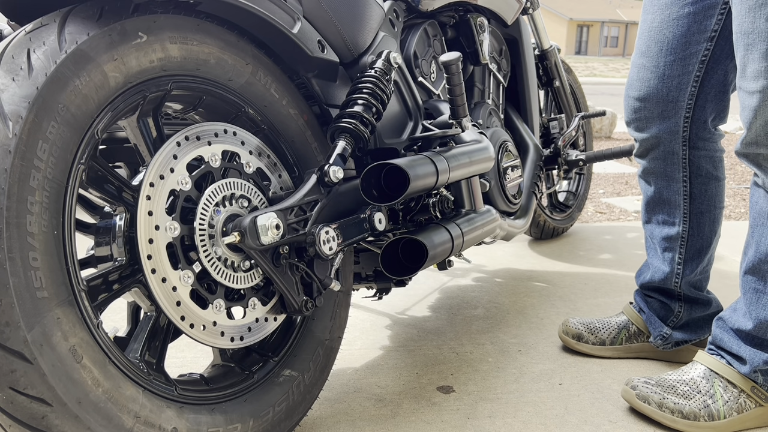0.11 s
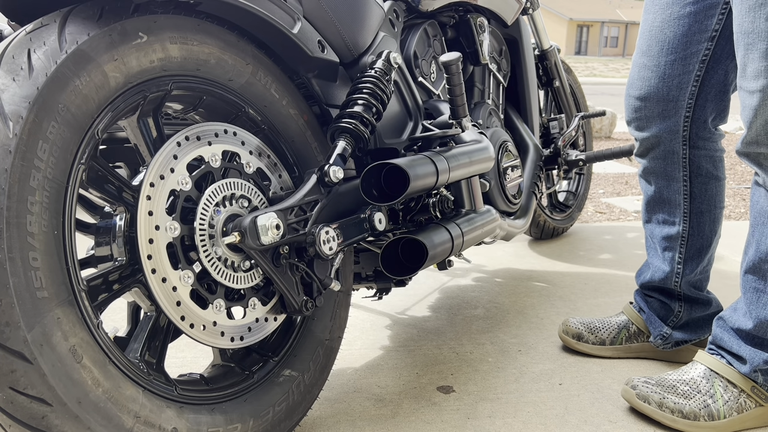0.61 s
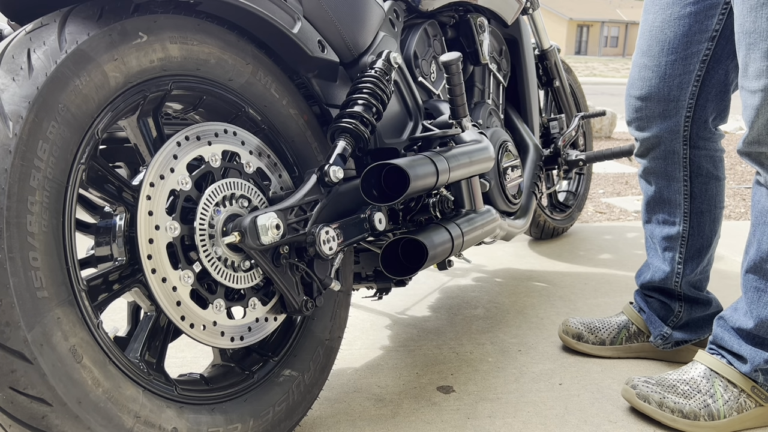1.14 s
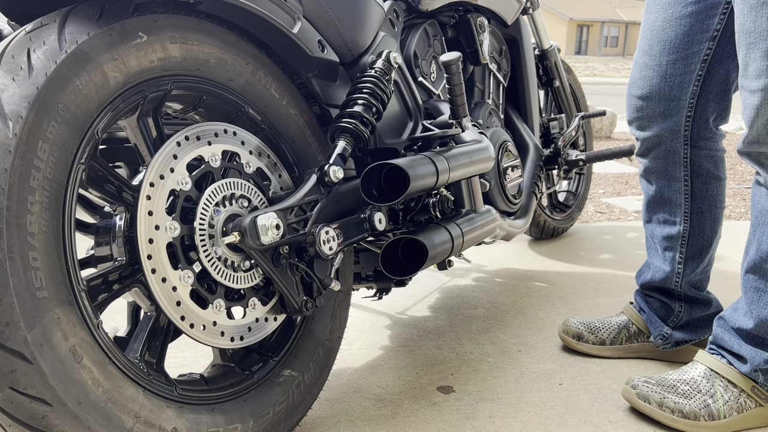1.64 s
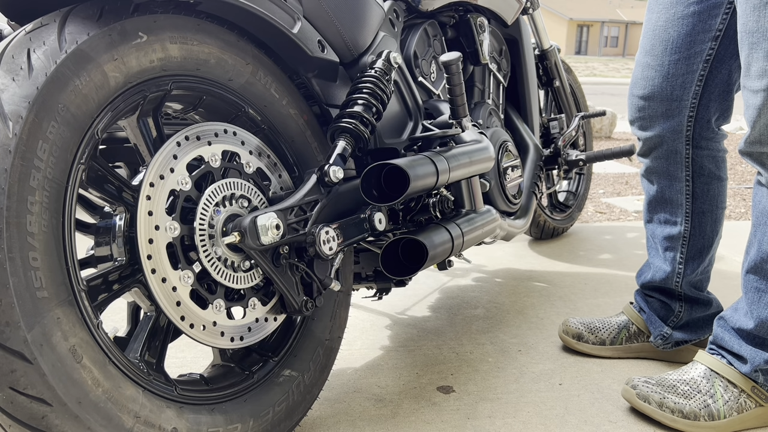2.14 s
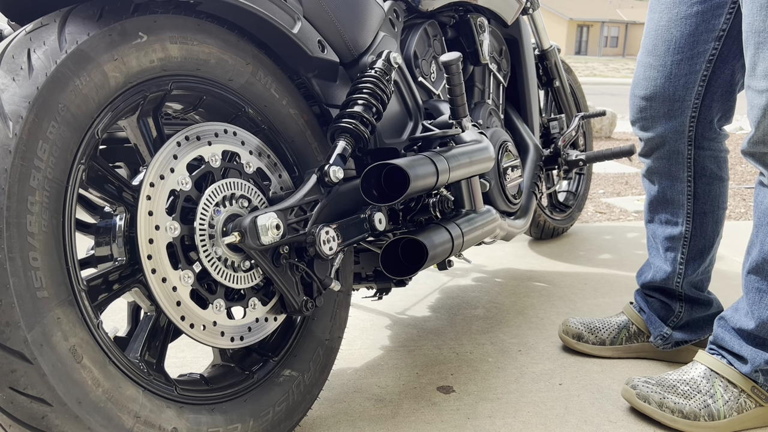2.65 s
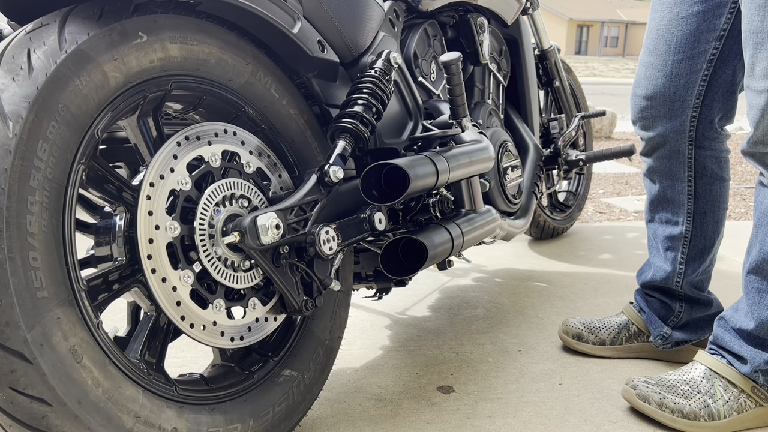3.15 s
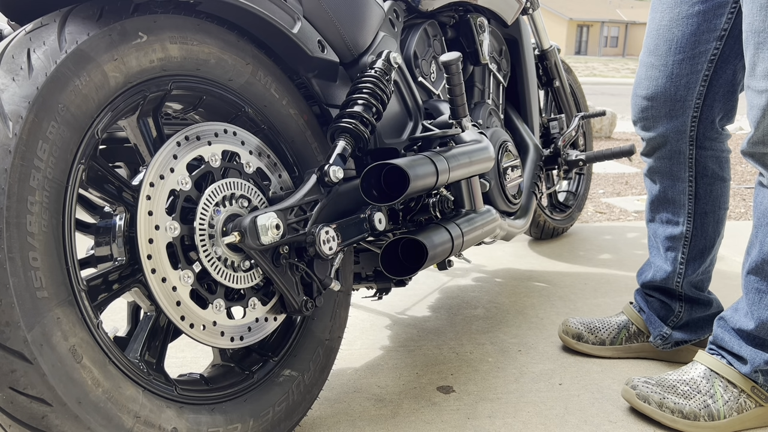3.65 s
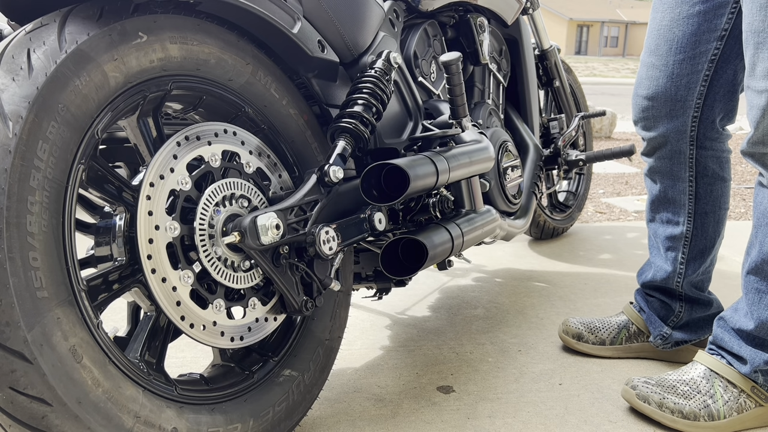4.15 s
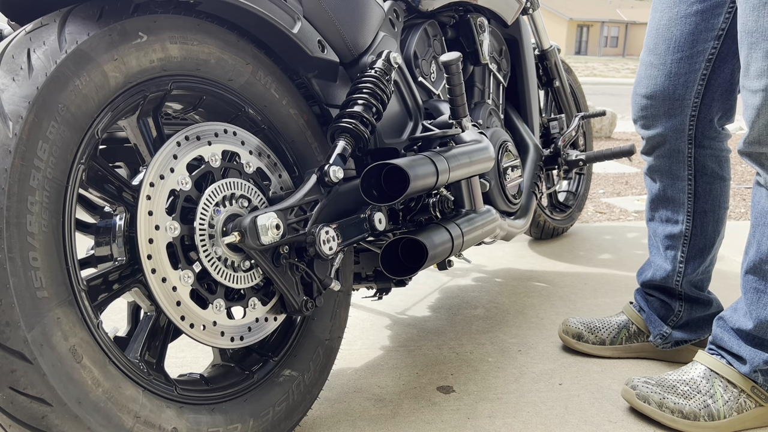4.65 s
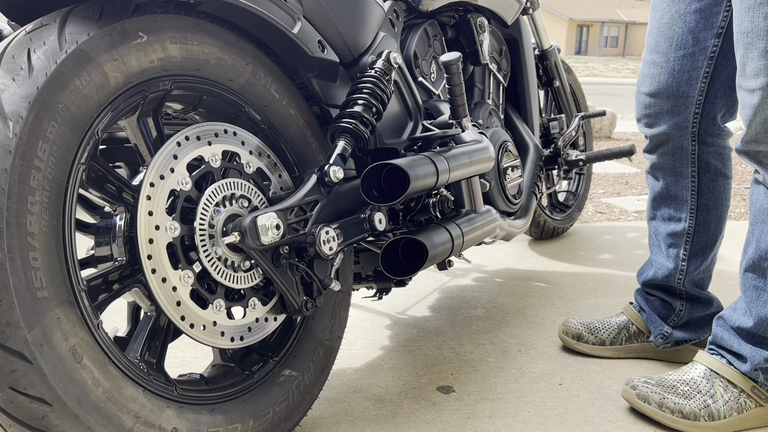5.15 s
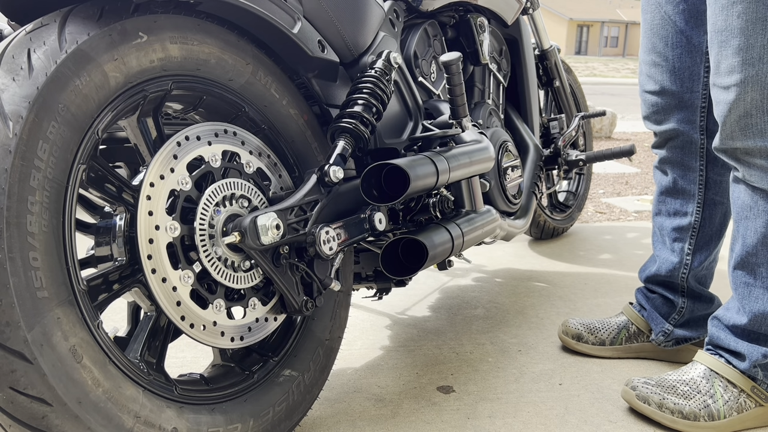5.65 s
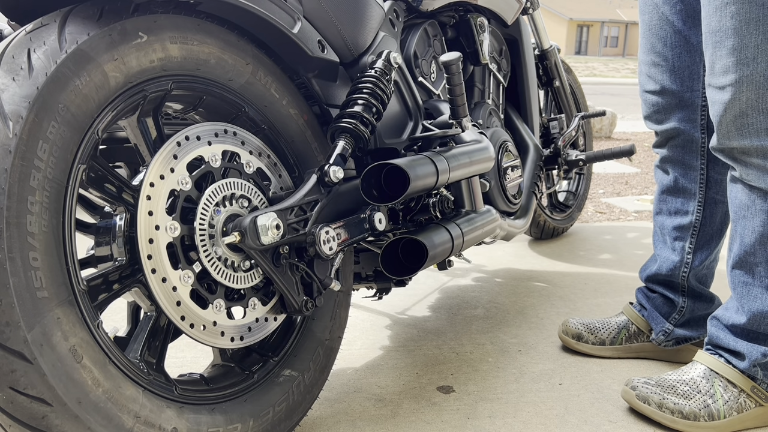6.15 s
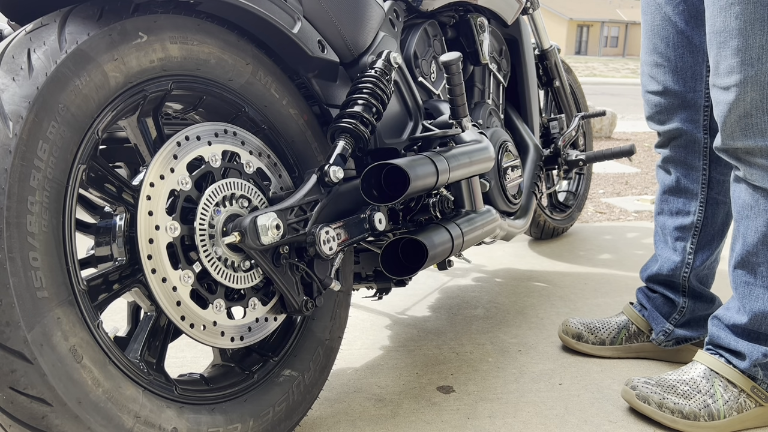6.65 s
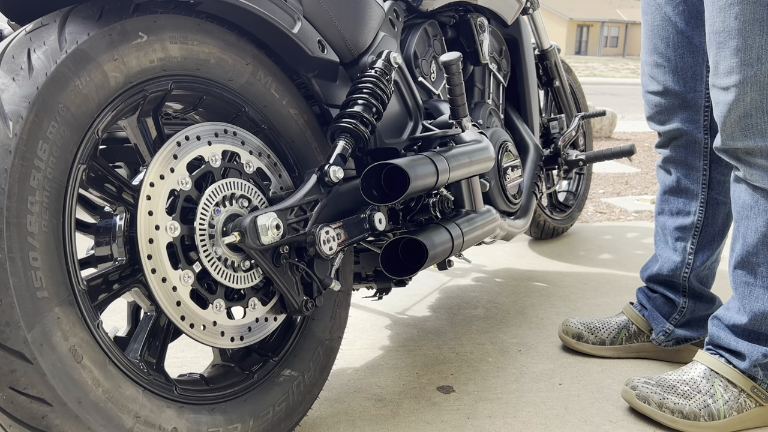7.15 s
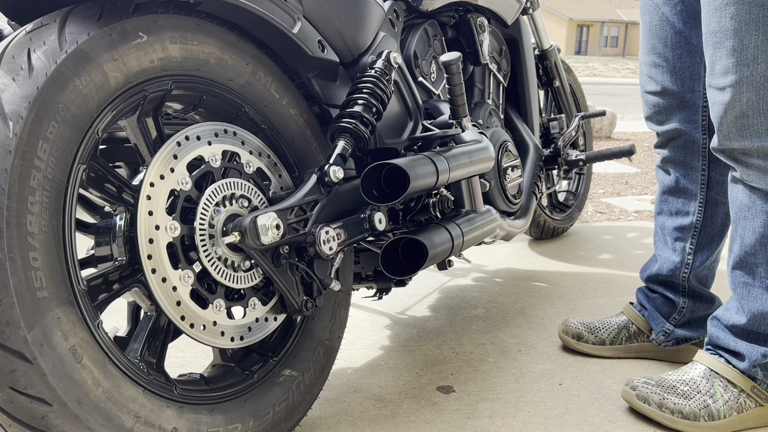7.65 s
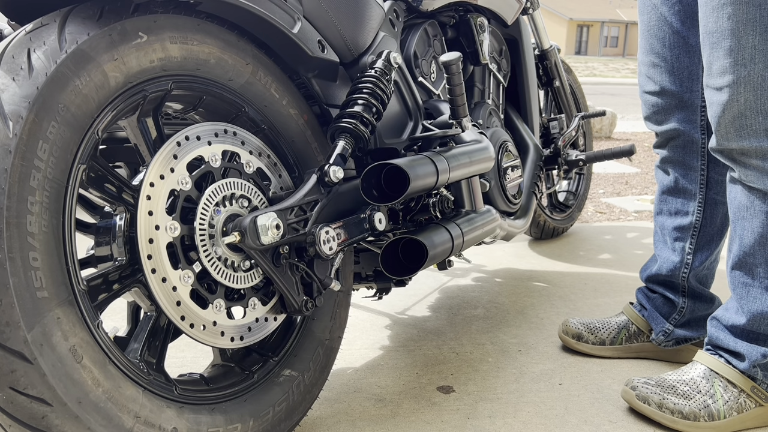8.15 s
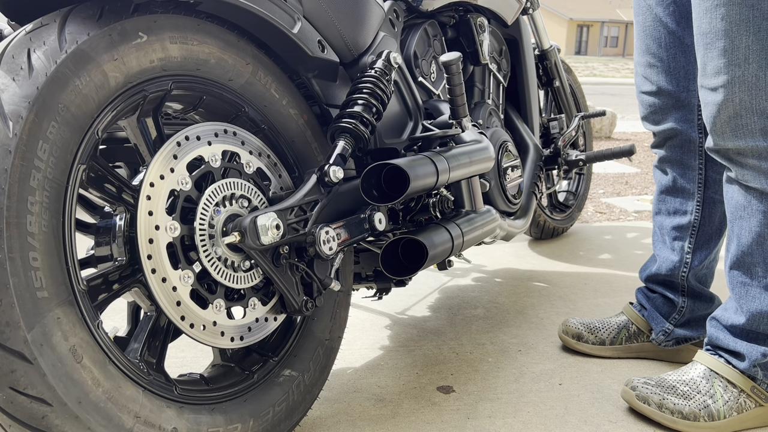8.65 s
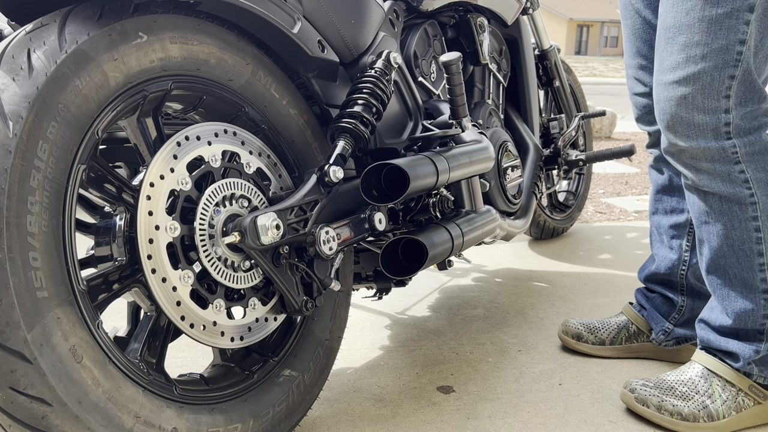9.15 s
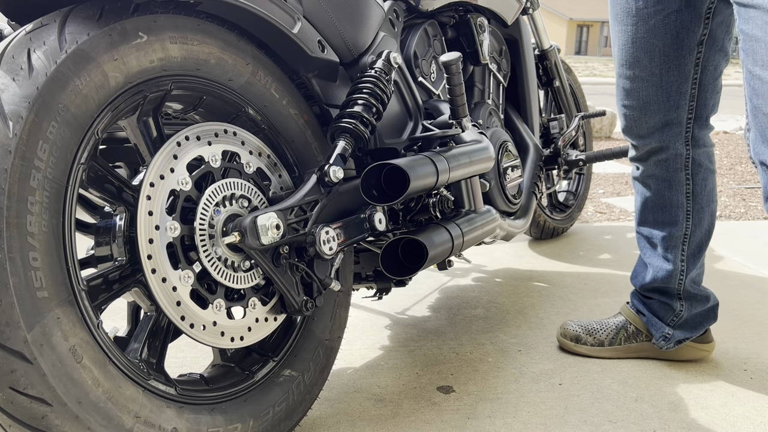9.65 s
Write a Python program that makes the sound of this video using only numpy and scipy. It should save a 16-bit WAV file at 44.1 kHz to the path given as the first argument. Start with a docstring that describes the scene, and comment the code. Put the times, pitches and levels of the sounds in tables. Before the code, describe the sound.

A V-twin motorcycle with open pipes idles lumpily, barks through two sharp throttle blips, idles on steadily, then is cut, ending with a shoe scuff.

```python
"""On a concrete driveway a 60-degree V-twin with two open pipes idles, is blipped twice, idles on and is cut.
Each exhaust valve opening spits a crack of gas and rings its pipe's modes; the closing rings them again.
Rasp and hiss follow load and speed; on a shut throttle a drone of crank orders hums through the pipes.
Soft strokes of plain air end the run, then a shoe scuffs; a far rumble lies under it all, heard by a phone."""
import sys
import numpy as np
from scipy import signal
from scipy.fft import rfft, irfft
from scipy.io import wavfile
from scipy.ndimage import uniform_filter1d

SR = 44100
rng = np.random.default_rng(int(sys.argv[2]) if len(sys.argv) > 2 else 0)


def bounce(signal):
    """Save signal as a 16-bit WAV file at the path given by the first command-line argument."""
    frames = np.transpose(np.atleast_2d(signal))
    limited = np.clip(frames, -1, 1)
    pcm = np.round(limited * 32767).astype(np.int16)
    wavfile.write(sys.argv[1], SR, pcm)


def gain_from_decibels(decibels):
    """Convert decibel values to linear amplitude factors."""
    exponent = np.asarray(decibels, float) / 20
    return 10 ** exponent


N = 431290
TIME = np.arange(N) / SR
HZ = np.maximum(np.arange(N // 2 + 1) * SR / N, 1)
IDLE_CYCLE_S, STOP_S = 0.0905, 9.08
SPIT_STEP = 0.6  # octaves between the bands of a spit

# crank speed: idle hunts a little, two blips climb and coast back, the cut slows it sharply: t/s, speed/rpm
CRANK = [(0.0, 1288.4), (0.43, 1355.5), (0.5, 1983.3), (0.6, 2759.1), (0.66, 3644.5), (1.2, 2354.7),
         (1.42, 1985.5), (1.58, 1660.7), (1.65, 1615.0), (1.69, 1752.7), (1.85, 2870.7), (1.89, 2672.9),
         (1.96, 2456.5), (2.67, 1413.7), (2.98, 1340.9), (3.07, 1302.8), (3.53, 1336.6), (3.93, 1324.1),
         (4.98, 1299.8), (5.12, 1242.0), (5.22, 1363.6), (5.58, 1297.6), (5.62, 1229.3), (5.86, 1350.5),
         (6.22, 1284.2), (6.41, 1311.8), (6.59, 1352.9), (6.9, 1318.9), (7.62, 1366.1), (7.93, 1299.9),
         (8.35, 1275.3), (8.58, 1395.6), (8.96, 442.8), (9.1, 891.9)]


def curve(table, column):
    """One column of a timed table, interpolated to every sample."""
    return np.interp(TIME, np.array(table)[:, 0], np.array(table)[:, column])


def over_hz(table):
    """A table over frequency, interpolated on a log axis to every bin."""
    f = np.maximum(np.array(table)[:, 0], 1)
    return np.interp(np.log(HZ), np.log(f), np.array(table)[:, 1])


def noise(spectrum, apart):
    """Stereo coloured noise whose centre has rms 1; `apart` scales a part opposite in the two sides."""
    white = rng.standard_normal((2, N))
    mid, side = irfft(rfft(white) * gain_from_decibels(over_hz(spectrum)), N)
    return (mid + apart * side * np.array([[1], [-1]])) / mid.std()


def flutter(depth_db, size):
    """Random gain of the given rms depth, smoothed over `size` samples."""
    return gain_from_decibels(depth_db * uniform_filter1d(rng.standard_normal(N), size=size) * np.sqrt(size))


def train(s, size):
    """One click at each time."""
    out = np.zeros(N)
    np.add.at(out, np.clip((s * SR).astype(int), 0, N - 1), size)
    return out


def puff(clicks, rise_s, fall_s):
    """Envelope that swells and dies after each click, peak near the click's size."""
    t = np.arange(SR // 8) / SR
    shape = (1 - np.exp(-t / rise_s)) ** 2 * np.exp(-t / fall_s)
    return np.maximum(signal.fftconvolve(clicks, shape / shape.max())[:N], 0)


def ring(hz, t60):
    """A struck mode: a sine that dies away by 60 dB in t60 seconds."""
    t = np.arange(SR // 4) / SR
    return np.sin(2 * np.pi * hz * t) * np.exp(-np.log(1000) * t / t60)


def crank():
    """Four-stroke cycles turned since the first firing, two crank turns to a cycle."""
    first_firing_s = 0.021
    cycles = np.cumsum(curve(CRANK, 1)) / 120 / SR
    return cycles - np.interp(first_firing_s, TIME, cycles)


def octaves():
    """Crank speed in octaves over an idle of 1320 rpm."""
    return np.log2(curve(CRANK, 1) / 1320)


def shut():
    """1 on a shut throttle, 0 on an open one; it takes a moment to close."""
    # the two blips: throttle opens/s, starts to shut/s
    blips = [(.44, .74), (1.68, 1.89)]
    closing_s = 0.04
    closed = np.ones(N)
    for opens, shuts in blips:
        still_open = np.clip((shuts + closing_s - TIME) / closing_s, 0, 1)
        closed = closed * (1 - (TIME > opens) * still_open)
    return closed


def law(rule, lag_s=0):
    """A layer's level in dB from its idle level, the load, the crank speed and the ignition."""
    # combustion over idle: hard on open throttle, lean when coasting, fading after the cut: t/s, load/dB
    load = [(0, 0.5), (.44, -2.5), (.465, 10.5), (.53, 14.5), (.70, 11), (.73, 2), (.845, 4.5), (.87, -4.5),
            (.95, -8.5), (1.0, -1.5), (1.12, -0.5), (1.22, -2.5), (1.3, -6.5), (1.42, -11), (1.5, -10.5),
            (1.62, -5), (1.69, 3.5), (1.72, 13), (1.8, 15.5), (1.87, 9.5), (1.89, -7), (2.0, -5), (2.2, -9),
            (2.3, -11), (2.42, -18.5), (2.55, -5), (2.7, 0), (7.2, 0), (8.0, -2), (8.65, 0), (9.0, -13),
            (9.08, -39), (9.3, -86)]
    ignition_off_s = 8.645
    coast_full_octaves = 0.85  # below this speed over idle the idle control feeds fuel again, by degrees
    idle_db, up, down, per_octave_db, coast_db, unfired_db = rule
    load_db = signal.lfilter([1], [1 + lag_s * SR, -lag_s * SR], curve(load, 1))
    level_db = idle_db + up * np.maximum(load_db, 0) + down * np.minimum(load_db, 0)
    level_db = level_db + per_octave_db * octaves()
    coast = shut() * np.clip(octaves() / coast_full_octaves, 0, 1)
    return level_db + coast_db * coast + unfired_db * (TIME > ignition_off_s)


def firings(cycles):
    """Valve openings of front and rear cylinder in turn, with the strength of each spit in dB."""
    # spit level: idle/dB, rise with load above and below idle/dB per dB, speed/dB per octave,
    # coasting/dB, unfired/dB
    crack_law = (-28, 3.95, 0.78, -2.5, -4, -20)
    # valve openings that stand out, hard or nearly missed: t/s, spit level/dB
    odd_firings = [(.3845, -26.5), (.4675, -18), (.4945, -12), (.5286, -9), (.5488, -10.5), (.5797, -7),
                   (.5961, -18.5), (.621, -11), (.6375, -16.5), (.6569, -17), (.6701, -15.5), (.689, -29),
                   (.7076, -21.5), (.728, -34.5), (.8322, -29.5), (1.6833, -20), (1.7231, -15.5),
                   (1.7453, -10.5), (1.7772, -15.5), (1.7977, -9.5), (1.8248, -13), (1.8423, -11.5),
                   (1.8671, -17.5), (1.9322, -23.5), (4.983, -28), (5.3507, -24.5), (5.532, -23),
                   (5.8486, -21), (6.4523, -25), (6.631, -26.5), (6.8104, -25), (6.9022, -23.5),
                   (6.9941, -25), (7.1174, -20.5), (7.5295, -25), (7.6177, -26), (8.4431, -25.5),
                   (8.532, -22.5), (8.621, -24), (8.772, -42)]
    rear_turn = 300 / 720  # the rear valve opens 300 crank degrees after the front
    rear_pipe_shorter_s = 0.0015
    rear_louder_db, scatter_db = 3.5, np.array([3, 0.47])  # scatter of front, rear
    k = np.arange(2 * int(np.interp(STOP_S, TIME, cycles)) + 1)
    rear = k % 2
    s = np.interp(k // 2 + rear_turn * rear, cycles, TIME) - rear_pipe_shorter_s * rear
    crack_db = np.interp(s, TIME, law(crack_law)) + rear_louder_db * rear
    crack_db = crack_db + scatter_db[rear] * rng.standard_normal(len(k))
    for at, db in odd_firings:
        crack_db[np.argmin(abs(s - at))] = db
    return s, crack_db


def pipes(s, cycle_s):
    """Both valve events strike the modes of the cylinder's own pipe; eddies in the flow keep them humming."""
    # modes of the front, then the rear pipe: f/Hz, t60/s, signed relative swing at valve opening, at closing
    pipe_modes = [
        [(57.5, 0.055, 0.95, -1.01), (85.2, 0.16, -2.37, -1.27), (99.4, 0.05, 1.24, 0.33),
         (161.0, 0.054, 2.72, 2.06), (184.5, 0.054, -1.07, -0.96), (286.4, 0.115, -0.39, -0.03),
         (373.1, 0.039, -0.82, 0.12), (428.1, 0.052, -0.11, -0.07)],
        [(69.1, 0.086, 1.6, 0.37), (87.8, 0.151, -1.71, -0.12), (143.9, 0.068, 1.2, 0.16),
         (175.4, 0.092, 0.72, 1.39), (192.8, 0.04, 0.6, -0.93), (262.8, 0.02, -3.06, 1.0),
         (320.5, 0.06, 0.26, -0.09), (417.1, 0.02, 0.21, 0.25)],
    ]
    # boom, and upper modes over the boom: idle/dB, rise with load above and below idle/dB per dB,
    # speed/dB per octave, coasting/dB, unfired/dB
    boom_law = (-16.5, 0.8282, 0.82, 0, 1.5, -23)
    upper_law = (1.5, 0.2863, -0.35, 2, 3, 0)
    blowdown_s = (0.0014, 0.001)  # the pressure wave trails the first spit of gas: front, rear
    valve_open = (0.2903, 0.267)  # share of a cycle from opening to closing: front, rear
    upper_hz = 220
    chance = rng.standard_normal((len(s), 2))
    level_db = law(boom_law)
    boom_db = np.interp(s, TIME, level_db) + 0.54 * chance[:, 0]
    upper_db = np.interp(s, TIME, law(upper_law)) + 0.4 * chance[:, 1]
    # faster running packs more blows into a second, so each one is smaller for the same level
    size = gain_from_decibels(boom_db) * np.sqrt(cycle_s / IDLE_CYCLE_S)
    upper = gain_from_decibels(upper_db)
    out, hum = 0, 0
    for k, modes in enumerate(pipe_modes):
        opening = s[k::2] + blowdown_s[k]
        closing = s[k::2] + valve_open[k] * cycle_s[k::2]
        eddies = rng.standard_normal(N)
        for hz, t60, at_opening, at_closing in modes:
            blow = size[k::2] * (upper[k::2] if hz > upper_hz else 1)
            # the valve seats gently, so its closing hardly reaches the upper modes
            seating = size[k::2] * (0.25 if hz > upper_hz else 1)
            blows = train(opening, at_opening * blow) + train(closing, at_closing * seating)
            mode = ring(hz, t60)
            out = out + signal.fftconvolve(blows, mode)[:N]
            hum = hum + signal.fftconvolve(eddies, mode)[:N]
    out = out + gain_from_decibels(level_db - 17) * hum / hum.std()
    # the wide pipe mouth passes little of the blow's treble
    return signal.sosfilt(signal.butter(3, 560, fs=SR, output="sos"), out)


def bark(s, crack_db):
    """Strong blowdowns steepen into a shock front: a hard knock that grows faster than the spit."""
    knocks = train(s + 0.00055, gain_from_decibels(2.58 * (crack_db + 13.5) + 15))
    return signal.sosfilt(signal.butter(2, [450, 1600], "band", fs=SR, output="sos"), knocks)


def spits(s, crack_db):
    """A sharp spit of gas at each valve opening, with a softer jet behind it."""
    # colour of the escaping gas: f/Hz, relative density/dB per Hz
    crack_colour = [(880, -34), (1500, -16), (2490, 2), (3000, -1.5), (3540, 2.5), (4100, -6), (4850, -5),
                    (5940, -6.5), (6510, -8.5), (9080, -9.5), (10200, -10), (11300, -12), (13800, -20.5),
                    (15500, -13.5), (16800, -48.5)]
    # bands of a spit: centre f/Hz, rear over front level/dB
    bands = [(1400 * 2 ** (SPIT_STEP * k), db) for k, db in enumerate([7.0, -1.0, -2.5, -3.0, 1.5, 4, 1.0])]
    jet, crack = rfft(noise(crack_colour, 0.22)), 0
    # the biggest spits carry less top, the faintest little else
    duller_db = 0.014 * np.maximum(crack_db + 27.5, 0) + 0.092 * np.clip(crack_db + 36.5, -10, 0)
    rear = np.arange(len(s)) % 2
    # no two spits have the same colour: each band draws its own strength
    chance = rng.standard_normal((len(s), len(bands)))
    for k, (hz, rear_db) in enumerate(bands):
        away = np.clip(np.log2(HZ / hz) / SPIT_STEP, -1, 1)
        band = irfft(jet * np.cos(np.pi / 2 * away) ** 2, N)
        band_db = crack_db + rear_db * rear + 2.3 * chance[:, k] - duller_db * k
        clicks = train(s - 0.0016, gain_from_decibels(band_db))
        sharp = gain_from_decibels(0.72) * puff(clicks, 0.00045, 0.0013)
        soft = gain_from_decibels(-11) * puff(clicks, 0.0023, 0.0091)
        crack = crack + band * (sharp + soft)
    return crack


def rasp(s, cycle_s):
    """Noise in the pipe mouths: each blow sets its own rasp going over a continuous floor."""
    # colour of the rasp: f/Hz, relative density/dB per Hz
    rasp_colour = [(260, 2), (450, 3.5), (471, -14), (606, -9.5), (906, -0.5), (1090, -6.5), (1180, -6),
                   (1320, -6), (1500, -19), (1950, -22), (3300, -120)]
    # rasp level: idle/dB, rise with load above and below idle/dB per dB, speed/dB per octave,
    # coasting/dB, unfired/dB
    rasp_law = (-33, 0.66, 0.6, 11, -1, -6.5)
    level_db = law(rasp_law, lag_s=0.013)  # the gas stream builds up and drains behind the throttle
    # read just after the blow, so the rasp steps up with the first hard firing
    beat_db = np.interp(s + 0.011, TIME, level_db) + 1.9 * rng.standard_normal(len(s))
    beats = train(s - 0.001, gain_from_decibels(beat_db + 2.5) * np.sqrt(cycle_s / IDLE_CYCLE_S))
    swell = puff(beats, 0.00051, 0.0031) + gain_from_decibels(-3.0) * puff(beats, 0.012, 0.0087) + gain_from_decibels(level_db - 11.5)
    # the gas swirls out unevenly
    return swell * flutter(2.0, 300) * noise(rasp_colour, 0.32)


def hiss():
    """The stream of gas hisses without beats, its level following load and speed."""
    # colour of the hiss: f/Hz, relative density/dB per Hz
    hiss_colour = [(760, -27), (1300, -8.5), (1480, -14.5), (2130, -4.5), (3120, -10.5), (3550, -12),
                   (5490, -13), (8750, -18), (10200, -45), (10900, -45), (12000, -47), (15600, -71.5),
                   (22000, -120)]
    # hiss level: idle/dB, rise with load above and below idle/dB per dB, speed/dB per octave,
    # coasting/dB, unfired/dB
    hiss_law = (-50, 0.92, 0.43, 12, -5, -1.5)
    # the gas stream builds up and drains behind the throttle
    return gain_from_decibels(law(hiss_law, lag_s=0.05)) * noise(hiss_colour, 0.91)


def coasting(cycles):
    """On a shut throttle the pistons only pump air: a fluttering drone locked to the crank, duller as it slows."""
    # lines of the drone at 19 cycles a second: multiple of the cycle rate, relative level/dB
    pumping = [(2, -29), (3, -24), (4, -16), (5, -5), (6, -10), (7, -17), (8, -13), (9, -17), (10, -14),
               (11, -12), (12, -17), (13, -22), (14, -24), (15, -15), (16, -20), (17, -22), (18, -20),
               (19, -23), (20, -19), (21, -21), (22, -24), (23, -24), (24, -26), (25, -24), (26, -25),
               (27, -25), (28, -26), (29, -27), (30, -26)]
    # what the pipes pass of the drone: f/Hz, gain/dB
    drone_pipe = [(30, -28), (55, -17), (90, 3.5), (130, -3), (175, 1.5), (240, -2.5), (330, -1.5),
                  (420, 3), (470, -8), (600, -12)]
    flutter_db, flutter_step_s, full_flutter_order = 4, 0.07, 12  # the low lines flutter less
    dies_octaves = 0.13  # speed over idle below which the drone fades steeply
    speed = np.clip(np.gradient(cycles) * SR - 19, -6, 6)
    knots = flutter_db * rng.standard_normal((len(pumping), 400))
    knot_s = flutter_step_s * np.arange(400)
    drone = 0
    for (order, db), start, wander in zip(pumping, rng.random(len(pumping)), knots):
        tilt_db = 0.026 * (order - 16.0) * speed
        wander_db = min(order / full_flutter_order, 1) * np.interp(TIME, knot_s, wander)
        drone = drone + gain_from_decibels(db + tilt_db + wander_db) * np.sin(2 * np.pi * (order * cycles + start))
    level_db = -18.5 + 6 * octaves() - 108 * np.maximum(dies_octaves - octaves(), 0)
    drone = np.sqrt(2) * gain_from_decibels(level_db) * shut() * drone
    return irfft(rfft(drone) * gain_from_decibels(over_hz(drone_pipe)), N) * (TIME < STOP_S)


def run_down():
    """Each last stroke swells softly into one note of a pipe."""
    # strokes of plain air around and after the ignition cut: t/s, pipe note f/Hz, peak level/dB, t60/s
    strokes = [(8.639, 85.5, -25, 0.55), (8.676, 175, -12.5, 0.18), (8.726, 89.2, -20, 0.48),
               (8.755, 168, -25, 0.081), (8.804, 163, -19.5, 0.27), (8.866, 84.7, -23, 0.3),
               (8.955, 83.6, -27, 0.34), (9.02, 134, -31.5, 0.094), (9.061, 86, -56, .3)]
    push = np.hanning(SR // 150)
    out = np.zeros(N)
    for s, hz, db, t60 in strokes:
        note = np.convolve(ring(hz, t60), push)
        first = int(s * SR)
        out[first:first + len(note)] += gain_from_decibels(db) * note / note.max()
    return out


def wall(boom):
    """A wall on one side returns the upper part of the boom a little late, opposite in the two sides."""
    late = np.roll(boom, int(0.0036 * SR))
    late = signal.sosfilt(signal.butter(1, 700, "high", fs=SR, output="sos"), late)
    return gain_from_decibels(-13.5) * late * np.array([[1], [-1]])


def scuff():
    """A sole drags over concrete grit: coloured noise with a rough, fluttering level."""
    # the drag of the sole: t/s, level/dB
    drag = [(9.02, -78), (9.038, -65), (9.056, -88), (9.061, -55.5), (9.085, -59), (9.158, -60.5),
            (9.18, -70), (9.232, -76), (9.35, -83)]
    # colour of sole on grit: f/Hz, relative density/dB per Hz
    sole_colour = [(290, -54), (500, -24.5), (1450, -17.5), (1810, -12), (1970, -19), (2210, -13),
                   (8000, -43), (10400, -71), (17600, -120)]
    gate = (TIME > drag[0][0]) & (TIME < drag[-1][0])
    return gain_from_decibels(curve(drag, 1)) * gate * flutter(3.0, 200) * noise(sole_colour, 0.54)


def rumble():
    """A far rumble: steady low noise, nearly the same in both sides."""
    # colour of the rumble: f/Hz, relative density/dB per Hz
    rumble_colour = [(18, -57), (30, -27), (70, -8), (92, -0.5), (140, -14), (167, -12), (222, -30),
                     (500, -43.5), (650, -70.5), (1100, -120)]
    return gain_from_decibels(-65.5) * noise(rumble_colour, 0.05)


def scene():
    """Engine, shoe and rumble."""
    cycles = crank()
    s, crack_db = firings(cycles)
    cycle_s = np.append(s[2:] - s[:-2], [s[-1] - s[-3]] * 2)
    boom = pipes(s, cycle_s) + bark(s, crack_db) + coasting(cycles) + run_down()
    gas = spits(s, crack_db) + rasp(s, cycle_s) + hiss()
    return boom + wall(boom) + gas + scuff() + rumble()


def ports(x):
    """The phone's two sound ports differ in phase and colour, half of it put on each side."""
    # phase of the ports: f/Hz, lead of the left/radians
    port_phase = [(0, 0), (1640, 0.1), (3270, 1.6), (4050, 0.7), (5340, 2.0), (5860, 1.3), (6200, 0.6),
                  (7320, -5.8), (7580, -5.1), (8790, -7.0), (11600, -11.9), (12600, -13.3), (15200, -18.5),
                  (16500, -19.0)]
    # colour of the ports: f/Hz, left minus right/dB
    port_balance = [(60, 0.0), (110, 0.0), (200, 0.5), (380, 1.0), (700, 0.0), (1290, 0.5), (2380, -1.0),
                    (4400, 2.5), (8120, 2.0), (15000, 0.0)]
    half = gain_from_decibels(over_hz(port_balance) / 2) * np.exp(0.5j * over_hz(port_phase))
    return irfft(rfft(x) * np.array([half, 1 / half]), N)


def gain_control(x):
    """Loud sound turns the gain down at once; it creeps back by a steady number of dB a second."""
    knee_db, slope, window_s, recovers_db_per_s = -15, 0.6, 0.12, 1.1157
    power = uniform_filter1d((x ** 2).mean(axis=0), size=int(window_s * SR))
    level_db = 10 * np.log10(power.clip(1e-12))
    creep_db = recovers_db_per_s * TIME
    wanted_cut_db = slope * np.maximum(level_db - knee_db, 0)
    cut_db = np.maximum.accumulate(wanted_cut_db + creep_db) - creep_db
    return x * gain_from_decibels(-cut_db)


def roll_off(x):
    """The treble ends steeply here."""
    return signal.sosfilt(signal.butter(12, 16990, fs=SR, output="sos"), x)


def record(dry):
    """The phone's ports colour the sound, its deepest bass is cut, its gain ducks, its peaks are rounded."""
    x = signal.sosfilt(signal.butter(4, 46, "high", fs=SR, output="sos"), ports(dry))
    x = gain_control(x)
    mix = np.tanh(0.94 * x) / 0.84
    return roll_off(mix)


dry = scene()
out = record(dry)
bounce(out)
```